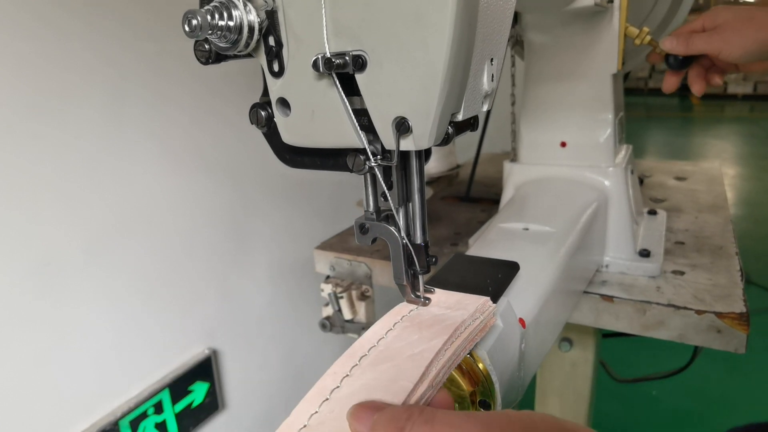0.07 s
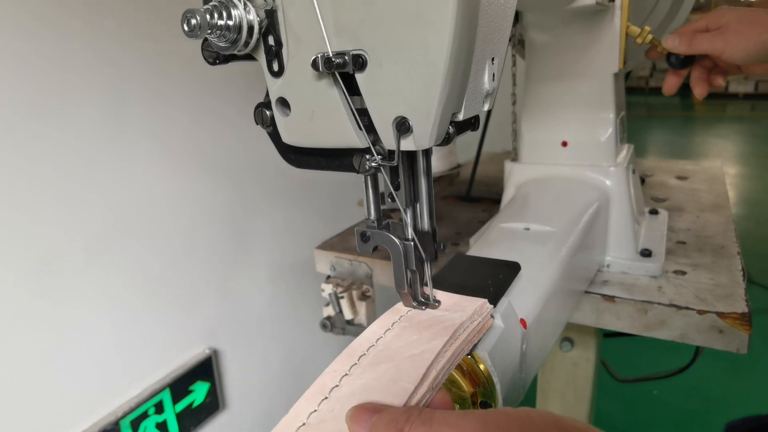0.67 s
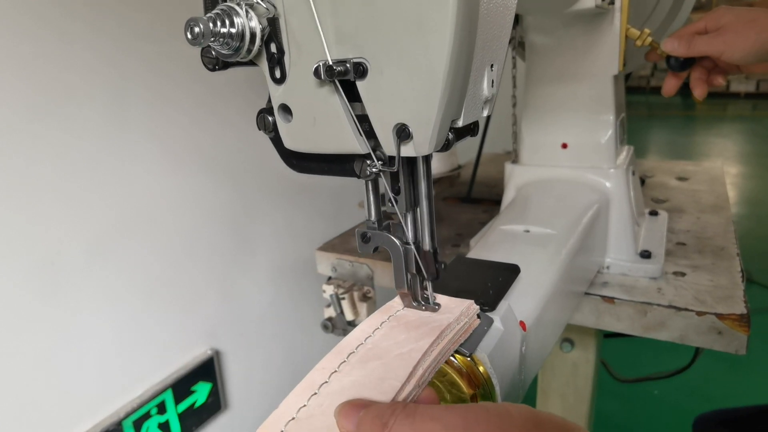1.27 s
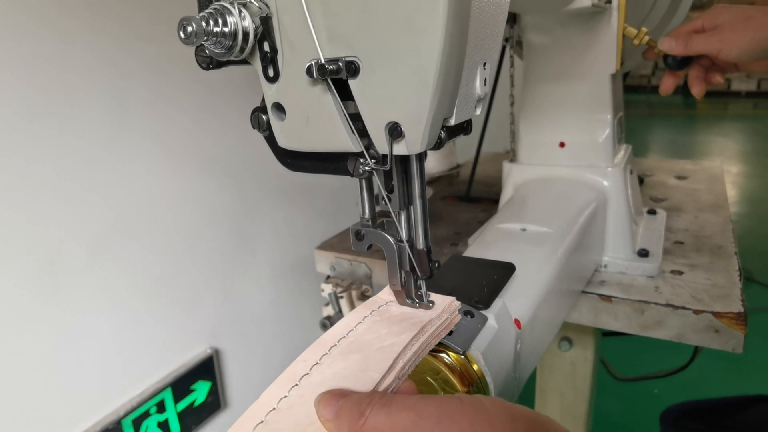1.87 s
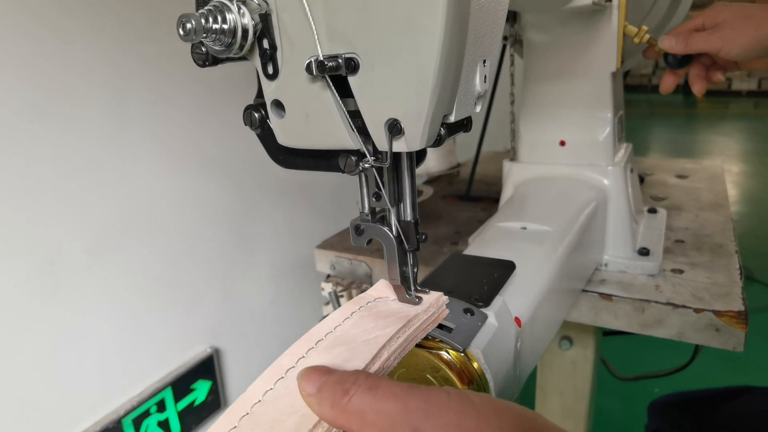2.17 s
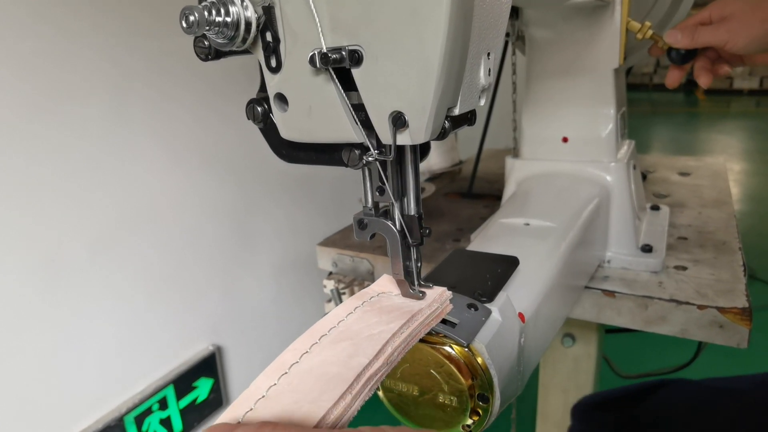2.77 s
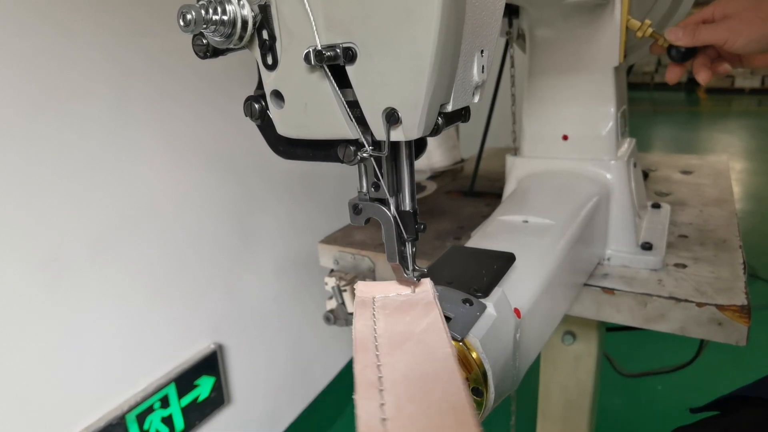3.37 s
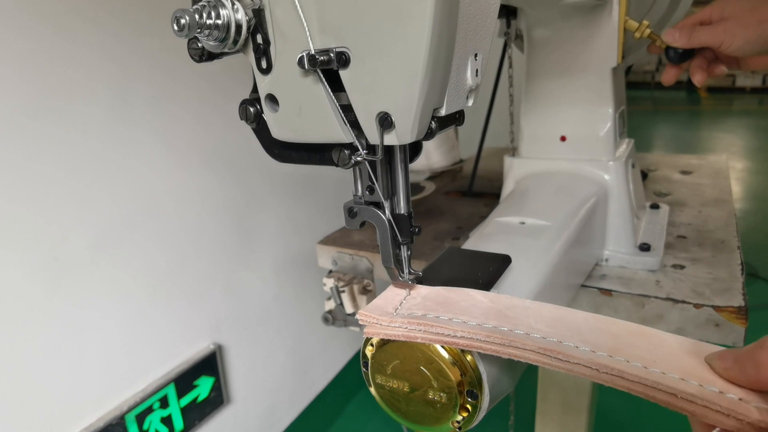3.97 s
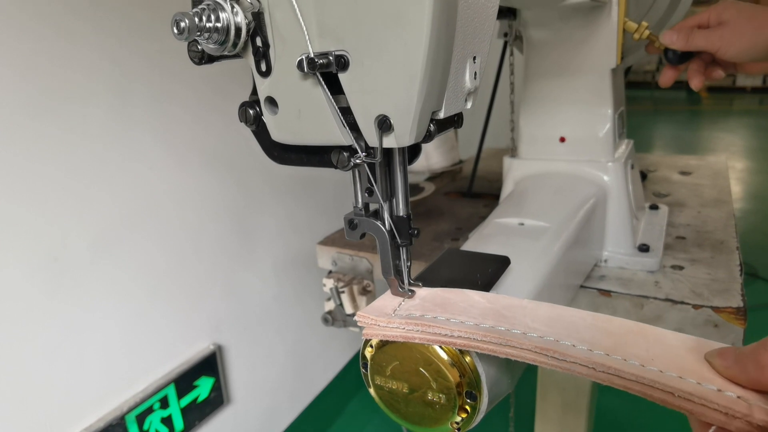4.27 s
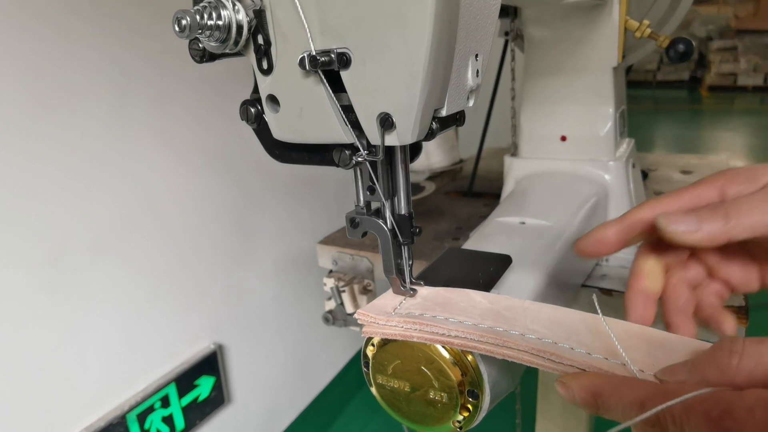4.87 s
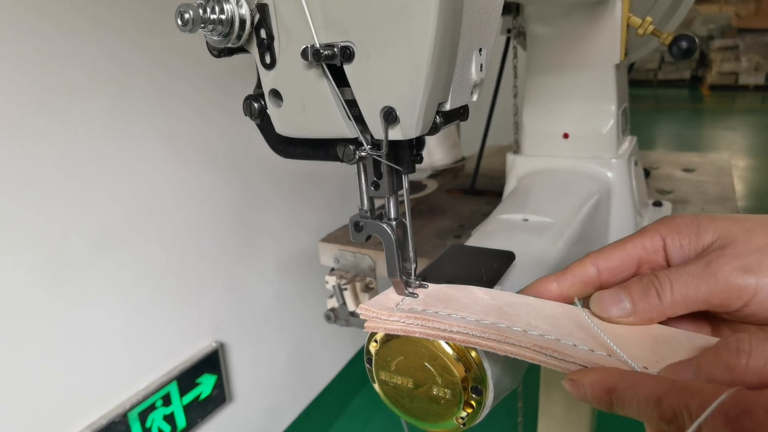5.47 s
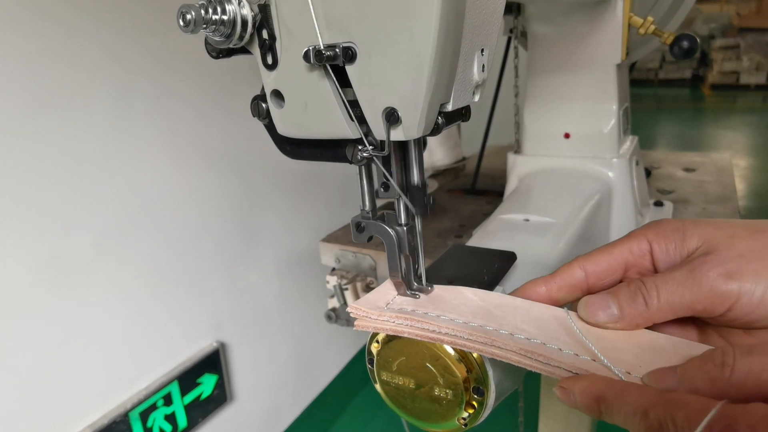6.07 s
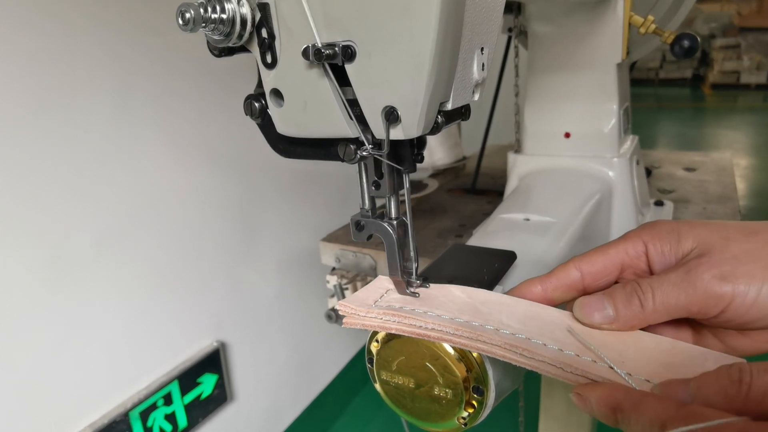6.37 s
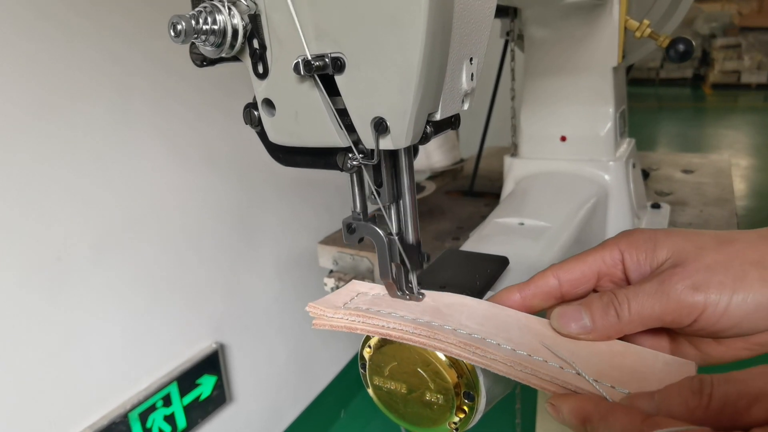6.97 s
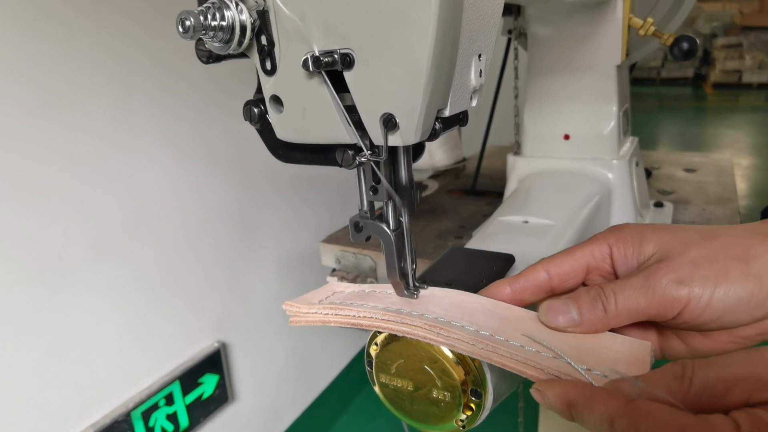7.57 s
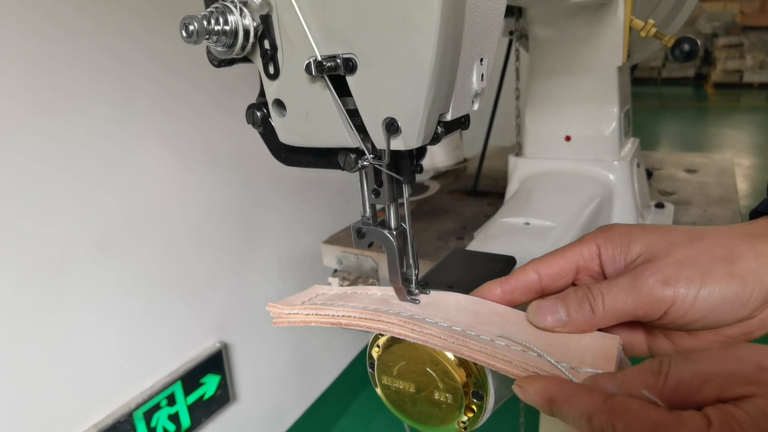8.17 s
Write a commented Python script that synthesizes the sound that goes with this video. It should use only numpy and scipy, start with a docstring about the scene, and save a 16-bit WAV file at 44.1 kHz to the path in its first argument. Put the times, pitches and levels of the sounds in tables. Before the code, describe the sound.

A heavy industrial sewing machine clacks through slow stitches, pauses for a hissing lever snap and a sharp slam, then stitches faster.

```python
"""A factory hall, two microphones close to a heavy walking-foot sewing machine on a thick leather strap.
Three slow stitches; the foot latches up with a hiss, the strap is turned, the foot snaps down; then
faster stitching. In each turn of the shaft links tick, the feed snaps, the feet thump and ring the iron
arm, and the needle bar clacks; the faster it turns, the louder it clatters. The hall rings on behind
each blow, machines drone far off, and a limiter ducks the two loud lever snaps."""
import sys
import numpy as np
from scipy import signal
from scipy.fft import rfft, irfft, next_fast_len
from scipy.io import wavfile
from scipy.ndimage import uniform_filter1d

SR = 44100
rng = np.random.default_rng(int(sys.argv[2]) if len(sys.argv) > 2 else 0)


def to_wav(sig):
    """Store sig (one row per channel, or 1-D mono) as 16-bit WAV at the path in sys.argv[1].

    Samples outside -1..1 are clipped; the rate is SR.
    """
    pcm = np.clip(np.atleast_2d(sig), -1, 1) * 32767
    pcm = np.round(pcm).astype(np.int16)
    wavfile.write(sys.argv[1], SR, pcm.T)  # frames by channels


N = 361619


# stitches: (first foot lands [s], its thump [dB], its pitch [Hz], second foot's lag [s], its thump [dB],
# arm ring [dB], needle bar clacks [s], its level [dB], linkage clatter [dB])
STITCHES = [(.2965, -5.5, 330, .02, -23, -18.5, .5243, -8.5, 4),
            (.884, -16.5, 251, .0266, -19.5, -18, 1.1247, -10.5, 0.5),
            (1.47, -14, 249, .0228, -16.5, -12.5, 1.7041, -8, 1.5),
            (5.329, -16.5, 319, .0038, -29, -23.5, 5.5319, -11, 1),
            (5.822, -17, 267, .021, -18, -23, 6.0135, -6.5, 1),
            (6.279, -18, 247, .014, -27, -22, 6.3995, -13.5, 0.5),
            (6.58, -12.5, 240, .0124, -10, -12.5, 6.66, -2.5, 4.5),
            (6.797, -17, 230, .012, -12, -14.5, 6.8937, -5, 3),
            (7.063, -15.5, 264, .014, -21, -19, 7.177, -6, 0),
            (7.353, -17.5, 242, .011, -16.5, -21.5, 7.4498, -4, -3.5),
            (7.604, -21, 277, .009, -16.5, -21, 7.7069, -7, -0.5),
            (7.884, -14.5, 295, .02, -25, -22, 7.9791, -6, -2),
            (8.154, -20, 290, .011, -18, -19, 8.26, -7, -5.5)]
# motor runs: (start [s], stop [s], belt grips [s], its jolt [dB], feed snaps [share of the turn])
RUNS = [(.212, 2.008, .214, -24, .343), (5.21, 8.4, 5.28, -21, .365)]
# heavier thuds of the feet, mostly as they change over or rebound: (time [s], level [dB], pitch [Hz])
THUDS = [(1.678, -20, 300), (1.965, -29, 420), (5.988, -20, 270), (6.613, -16, 270), (6.882, -22, 300)]
# places in a turn, counted from the needle's clack: shaft at rest, feet landing, feet changing over
REST_SHARE, LAND_SHARE, CHANGE_SHARE = .5, .61, .955

def footfalls(soft_hz=310, ring_offset_db=-12, rebound_s=.0125):
    """Blows as (time [s], level [dB], pitch [Hz], ring [dB]): feet, belt jolts and needle strokes."""
    blows = [(s, -26, soft_hz, -27) for s in passes(CHANGE_SHARE)]
    blows += [(s, db, soft_hz, db + ring_offset_db) for _, _, s, db, _ in RUNS]
    blows += [(s, db, hz, db + ring_offset_db) for s, db, hz in THUDS]
    blows += [(s, db - 34, soft_hz, db - 24) for *_, s, db, _ in STITCHES]  # needle
    for s, first_db, first_hz, lag, second_db, ring_db, *_ in STITCHES:
        blows += [(s, first_db, first_hz, ring_db - 9), (s + lag, second_db, 320, ring_db)]
        late, higher = rng.uniform(.8, 1.2, 2)  # the second foot rebounds unevenly
        db = second_db - 5
        blows.append((s + lag + rebound_s * late, db, 330 * higher, db + ring_offset_db))
    return blows


# modes of the cast-iron arm and table: (frequency [Hz], level [dB], t60 [s])
ARM_MODES = [(123.6, -24, 0.33), (188.8, -17, 0.3), (245, -15, 0.28), (289, -15.5, 0.65),
             (334.2, -15.5, .3), (363.5, -13.5, 0.12), (404, -13, 0.088), (649, -23, .07)]
# a foot's thud on leather: (frequency [Hz], level [dB])
THUD_SPECTRUM = [(100, -22), (250, 4), (400, 4.5), (650, 0), (900, -9), (1600, -16), (3000, -28),
                 (6000, -57)]

def feet(push_s=.003023, spread_db=2, ring_hz=527, ring_t60=.12):
    """Leather cushions each blow to a short push and a dull thud; the arm rings in a changing blend."""
    t, out = np.arange(SR // 2) / SR, np.zeros((2, N))
    late = t - 2 * push_s
    modes = np.array([amp(db - 60 * t / t60) * np.cos(2 * np.pi * hz * late)
                      for hz, db, t60 in ARM_MODES])
    modes *= amp(-2) * (1 - np.exp(-(t / push_s / 2) ** 2))
    ring = amp(-1 - 60 * t / ring_t60) * (1 - np.exp(-t / .0023)) * np.sin(2 * np.pi * ring_hz * t)
    for s, db, push_hz, ring_db in footfalls():
        push = amp(-3.5) * np.exp(-(late / push_s) ** 2 / 2) * np.cos(2 * np.pi * push_hz * late)
        blend = amp(spread_db * rng.standard_normal(len(ARM_MODES)))
        add(out, s, amp(db) * (push + blend @ modes) + amp(ring_db) * ring)
        add(out, s, blow(THUD_SPECTRUM, db - 14, rise=.00073, decay=.026))
    return out


# hard clacks outside the cycle, as the shaft stops and as it speeds up: (time [s], level [dB])
EXTRA_CLACKS = [(2.0077, -13), (6.3754, -15)]
# steel striking steel: (frequency [Hz], level [dB])
CLACK_SPECTRUM = [(1500, -25.5), (3500, -5.5), (5000, -4.5), (6000, -1), (7000, -8), (8200, -8.5),
                  (9300, -8), (10800, -8.5), (12000, -22), (15500, -33)]
# resonances of the steel bars and feet: (frequency [Hz], width [Hz], boost [dB])
STEEL_MODES = [(1130, 73, 3), (1880, 160, 2), (2150, 90, -2.5), (2550, 78, 2.5), (2760, 130, 7),
               (4630, 100, 4), (5540, 170, 5), (6000, 750, 3.5), (6620, 200, 4), (7300, 740, 3.5),
               (7600, 69, 2), (8060, 400, 6.5), (8500, 410, 5), (9490, 200, 3.5)]
# the knock of the head casting: (frequency [Hz], level [dB])
HEAD_SPECTRUM = [(150, -10), (450, 5), (800, 3.5), (1400, -3.5), (2400, 5), (3500, -27), (5000, -9),
                 (9000, -41)]
# pitches around which the head casting rings: (frequency [Hz])
HEAD_MODES = [680, 1120, 1520, 1820, 2150, 2480, 2760]

def needle_bar(hold_s=.0095, lead_s=.014, detune=.03):
    """Steel grazes steel, strikes and chatters; the head casting knocks and rings anew each time."""
    out = np.zeros((2, N))
    strokes = [(s, db) for *_, s, db, _ in STITCHES]
    for s, db in strokes + EXTRA_CLACKS:
        add(out, s - lead_s, blow(TICK_SPECTRUM, db - 22, rise=.0057, decay=.0043, hold=lead_s))
        add(out, s, blow(CLACK_SPECTRUM, db - 9, rise=.00037, decay=.0043, hold=hold_s, variety=.46))
        add(out, s, blow(HEAD_SPECTRUM, -27.5, rise=.00099, decay=.016, hold=hold_s, variety=.36))
        for hz in HEAD_MODES:
            detuned_hz = hz * (1 + detune * rng.uniform(-1, 1))
            add(out, s, ping(detuned_hz, db=-35 + 3 * rng.standard_normal(), decay=.014))
    return out * chatter(depth_db=2, size=30)


def feed(db_per_doubling=1):
    """The feed takes up the strap once a turn with a bright snap."""
    out, (_, speed, _) = np.zeros((2, N)), motion()
    for start, stop, _, _, share in RUNS:
        for s in passes(share):
            if start < s < stop:
                db = db_per_doubling * np.log2(speed[int(s * SR)])
                add(out, s, blow(TICK_SPECTRUM, db - 25, rise=.00048, decay=.004, hold=.0066, variety=.22))
                add(out, s, sparkle(db - 38))
                add(out, s, blow(HEAD_SPECTRUM, db - 33, rise=.001, decay=.015, hold=.0073, variety=.49))
    return out


# links and thread take-up, ticking once a turn:
# (place [share of the turn], level at usual speed [dB], change per doubling of speed [dB], ring [Hz])
CYCLE_TICKS = [(.138, -19.5, -4, 10900), (.291, -20, 5, 5740), (.553, -19, 5, 7950),
               (0.806, -25, -0.5, 6820)]
# distinct clicks of levers and slack links: (time [s], level [dB], ring [Hz])
SLACK_CLICKS = [(0.2605, -21, 5900), (.272, -20, 5900), (.29, -10, 7400), (.4493, -19.5, 5870),
                (1.0654, -17.5, 7100), (1.6685, -21, 6130), (2.012, -6, 9100), (2.6607, -29, 6700),
                (2.6854, -24.5, 8500), (2.9476, -24.5, 8730), (3.051, -15, 5930), (3.1895, -16, 7280),
                (4.3415, -31, 7800), (5.3293, -24, 6900), (5.4742, -18.5, 6000), (5.5055, -17, 6950),
                (5.6738, -12.5, 5760), (5.7985, -13.5, 6100), (5.92, -19.5, 7200), (5.9638, -14, 6000),
                (6.1477, -11.5, 5830), (6.3535, -11, 7000), (6.402, -9, 7730), (6.457, -14, 8170),
                (6.4967, -11, 5750), (6.5205, -13, 8530), (6.5685, -13, 7650), (6.6351, -8, 8070),
                (6.8576, -11.5, 6200), (7.1394, -17.5, 6000), (7.4212, -16, 6900), (7.5615, -16, 5600),
                (7.589, -13, 7800), (7.6756, -16, 6950), (7.8585, -16, 7710), (7.942, -17, 5900)]
# a light steel tick: (frequency [Hz], level [dB])
TICK_SPECTRUM = [(200, -13), (900, -12), (4000, -13), (5500, 1), (7800, -3), (9300, 0.5), (10800, -3),
                 (12000, -10), (15500, -29)]

def links():
    """Light links take up their play, each with a ping and a glint; a faint steel scrape rings on behind."""
    out, (_, speed, _) = np.zeros((2, N)), motion()
    cycle = [(s, db + per_doubling * np.log2(speed[int(s * SR)]), hz)
             for share, db, per_doubling, hz in CYCLE_TICKS for s in passes(share)]
    for s, db, hz in cycle + SLACK_CLICKS:
        add(out, s, blow(TICK_SPECTRUM, db - 6.5, rise=.0006, decay=.0034, hold=.0003,
                         variety=.5, ring=(hz, 500, 9)))
        add(out, s, ping(hz, db - 9, decay=.0035))
        add(out, s, sparkle(db - 31))
        add(out, s, blow(SLIDE_SPECTRUM, db - 22, rise=.00098, decay=.016))
    return out


def loose_joints(per_turn=10, db_per_doubling=10, spread_db=2, low_hz=800, high_hz=3600):
    """Worn joints knock at random places in the turn with a short metallic ring, harder at speed."""
    out, (angle, speed, clatter_db) = np.zeros((2, N)), motion()
    hits = np.flatnonzero(rng.random(N) < per_turn * np.gradient(angle))
    for i, (size, pitch) in zip(hits, rng.random((len(hits), 2))):
        db = -38.5 + db_per_doubling * np.log2(speed[i]) + clatter_db[i] + spread_db * (2 * size - 1)
        hz = low_hz * (high_hz / low_hz) ** pitch
        add(out, i / SR, blow(SLIDE_SPECTRUM, db, rise=.0007, decay=.011, ring=(hz, 220, 14)))
    return out


# knocks of the foot lifter: (time [s], level [dB], decay [s])
LIFTER_KNOCKS = [(2.686, -44, .015), (3.029, -33, 0.013), (3.049, -19, 0.0045), (3.056, -17, .003),
                 (4.429, -11, 0.0034)]
# the lifter knocking, going up and dropping: (frequency [Hz], level [dB])
KNOCK_SPECTRUM = [(200, -8), (750, -1), (1400, -15), (2000, 12.5), (2700, -12), (4000, -12), (9000, -23)]
LIFT_SPECTRUM = [(200, -20), (1300, -33), (1650, -14), (3000, -18.5), (4700, -19), (5300, -3.5), (6600, -4),
                 (7700, 2), (8400, -7), (10300, -13), (11300, -22), (12300, -32), (15000, -36)]
DROP_SPECTRUM = [(150, -34), (300, -5.5), (1150, -10), (1700, -12), (2500, -1), (3700, -3), (5200, 3),
                 (7900, 1), (9200, -10), (11000, -18), (12000, -37), (15500, -49)]
# resonances of the lifter and of the steel foot: (frequency [Hz], width [Hz], boost [dB])
LIFTER_MODES = [(2080, 400, 6), (5390, 150, 6), (6020, 150, 7), (7270, 200, 8), (9900, 300, 8)]
FOOT_MODES = [(800, 400, 11.5), (1420, 160, 12), (1970, 230, 18), (5550, 400, 5), (6150, 250, 7)]
# modes of the presser bar as the foot lands: (frequency [Hz], level [dB], t60 [s])
PRESSER_MODES = [(291, -33.5, 0.46), (947, -39, 0.46), (1938, -31, 0.36), (2110, -30, 0.38),
                 (3295, -37, .38), (5459, -33, .45)]

def foot_lifter():
    """A spring pings, the lifter latches with a rasping hiss; later the foot slams and its bar rings."""
    t, out, hiss = np.arange(SR) / SR, np.zeros((2, N)), np.zeros((2, N))
    add(out, 2.9475, ping(8750, -46.5, decay=.049))
    for s, db, decay in LIFTER_KNOCKS:
        add(out, s, blow(KNOCK_SPECTRUM, db, rise=.0039, decay=decay))
    add(out, 3.0655, blow(LIFT_SPECTRUM, -13, rise=.004, decay=.003, hold=.004, body=LIFTER_MODES))
    add(out, 3.07, blow(LIFT_SPECTRUM, 5, rise=.004, decay=.003, hold=.0031, body=LIFTER_MODES))
    add(hiss, 3.08, blow(LIFT_SPECTRUM, -25.5, rise=.045, decay=.04, hold=.12, body=LIFTER_MODES))
    add(out, 4.408, blow(DROP_SPECTRUM, -33, rise=.02, decay=.005, hold=.02, body=FOOT_MODES))
    add(out, 4.4285, blow(DROP_SPECTRUM, -3.5, rise=.0024, decay=.0037, hold=.0055, body=FOOT_MODES))
    for hz, db, t60 in PRESSER_MODES:
        add(out, 4.43, amp(db - 60 * t / t60) * np.sin(2 * np.pi * hz * t))
    return out + hiss * chatter(depth_db=1.8, size=120)


# friction through one turn: (place [share of the turn], level [dB])
STROKE_FRICTION = [(0, 1), (.08, -11.5), (.19, -2.5), (.29, -7), (.37, -3), (.5, -5.5), (.6, -1.5),
                   (.78, -13), (.9, -7)]
# sliding bars and running gears: (frequency [Hz], level [dB])
SLIDE_SPECTRUM = [(200, -20), (700, -7), (1400, -0.5), (2500, 6), (3800, -0.5), (6000, 3), (8500, -4.5),
                  (10800, -5.5), (12200, -12), (15500, -26)]
GEAR_SPECTRUM = [(40, -23), (70, -16), (125, -9), (190, -4), (290, 0), (390, -3.5), (470, -19), (527, -5),
                 (590, -8.5), (900, -18.5), (2000, -52)]

def drive(swing_db=1.5, heaviest_share=.98, coast_s=.99):
    """Bars scrape and gears rumble under each turn's load, louder with speed; the stopped motor coasts."""
    t, (angle, speed, clatter_db) = np.arange(N) / SR, motion()
    stroke_db = np.interp(angle, *np.transpose(STROKE_FRICTION), period=1)
    friction = amp(-36.5 + stroke_db + clatter_db) * speed ** 1.4
    scrape = friction * noise(N, SLIDE_SPECTRUM, STEEL_MODES) * rattle(per_s=50, decay=.0077, smooth=.94)
    load_db = swing_db * np.cos(2 * np.pi * (angle - heaviest_share))
    gears = amp(-36.5 + load_db + .44 * clatter_db) * speed ** .66
    coast = amp(-53) * sum((t > stop) * np.exp(-abs(t - stop) / coast_s) for _, stop, *_ in RUNS)
    return scrape + (gears + coast) * noise(N, GEAR_SPECTRUM)


# the strap hauled along by the feed: (frequency [Hz], level [dB])
HAUL_SPECTRUM = [(65, -24), (118, 0), (200, 0), (340, -22), (1500, -80)]

def haul(thread_share=.24, rumble_share=.37):
    """After each clack the thread crackles as it tightens and the strap moves on with a low rumble."""
    angle, speed, clatter_db = motion()
    hauling = np.exp(-((angle % 1 - rumble_share) / .15) ** 2)
    tightening = np.exp(-((angle % 1 - thread_share) / .08) ** 2)
    rumble = amp(-34.5) * hauling * noise(N, HAUL_SPECTRUM)
    thread = amp(-40 + clatter_db) * tightening * noise(N, TICK_SPECTRUM, STEEL_MODES)
    return speed * (rumble + thread * rattle(per_s=110, decay=.002, smooth=0))


# the strap rubs on the table: (middle [s], half length [s], level [dB])
STRAP_RUB = (2.6, 0.5, -50.5)
# the strap is dragged over the arm: (time [s], level [dB])
DRAG_LEVEL = [(1.98, -66), (2.12, -36), (2.36, -42), (2.6, -50), (2.78, -54), (2.88, -45.5), (3.05, -45.5),
              (3.12, -81)]
# dull bumps of the work: (time [s], level [dB], decay [s])
TABLE_BUMPS = [(2.151, -34, .025), (2.213, -28, .035)]
# rubbing leather and a bump on the table: (frequency [Hz], level [dB])
LEATHER_SPECTRUM = [(100, -14), (300, 3), (700, -4), (2200, -7.5), (4500, -15), (10000, -25), (15000, -52)]
BUMP_SPECTRUM = [(30, -20), (50, -3), (90, 4), (130, 0), (220, 2.5), (300, -12), (600, -19), (2000, -53)]

def handling():
    """Hands shift the work at the stop: the strap rubs, drags with a rumble and bumps the table."""
    t, (middle, half, rub_db) = np.arange(N) / SR, STRAP_RUB
    rub = amp(rub_db) * np.exp(-((t - middle) / half) ** 4)
    out = rub * chatter(depth_db=1.5, size=2000) * noise(N, LEATHER_SPECTRUM)
    out += amp(np.interp(t, *np.transpose(DRAG_LEVEL))) * noise(N, BUMP_SPECTRUM)
    for s, db, decay in TABLE_BUMPS:
        add(out, s, blow(BUMP_SPECTRUM, db, rise=.0084, decay=decay))
    return out


# the hall's reverberation before scaling by t60_share: (frequency [Hz], t60 [s])
HALL_DECAY = [(200, 0.96), (550, 0.64), (1400, 0.77), (3700, 0.77), (7000, 0.63), (10000, 0.56),
              (14000, 0.46)]

def hall(x, build_s, t60_share):
    """The hall answers with a diffuse tail that builds up, then dies at its own speed in each band."""
    hz, t, bands = signal.stft(noise(SR), SR, nperseg=256)
    t60 = t60_share * read(HALL_DECAY, hz)[:, None]
    tail = signal.istft(bands * amp(-60 * t / t60), SR, nperseg=256)[1][:, :SR]
    tail *= 1 - np.exp(-np.arange(SR) / SR / build_s)
    return signal.fftconvolve(x, tail / np.linalg.norm(tail[0]), axes=1)[:, :N]


# room tone of the hall: (frequency [Hz], level [dB])
AIR_SPECTRUM = [(12, -36), (20, -21), (53, 0.5), (107, -13.5), (127, -8), (204, -10.5), (450, -21),
                (698, -22.5), (1570, -26.5), (2140, -18.5), (3250, -34.5), (8650, -33), (16000, -88)]
# motor hum: (time [s], level [dB])
HUM_LEVEL = [(0, -49), (1.2, -41), (2.9, -46.5), (4.0, -70), (7.4, -62), (7.7, -42), (8.2, -57)]

def factory(hum_hz=49):
    """Motors and distant machines: a wash of air, a wavering hum and a thin whirr."""
    t = np.arange(N) / SR
    waver = np.minimum(chatter(depth_db=3.5, size=6000), 2)
    hum = amp(np.interp(t, *np.transpose(HUM_LEVEL)) - 1) * np.sin(2 * np.pi * hum_hz * t) * waver
    whirr_spectrum = [(800, -30), (1800, 0), (2400, -21), (3500, -30), (6000, 29), (9000, -32),
                      (12000, -45)]
    whirr = amp(-66) * noise(N, whirr_spectrum, STEEL_MODES)
    return amp(-47.5) * noise(N, AIR_SPECTRUM) + hum + whirr


def shaft():
    """Times and turns completed: the shaft passes the same places in each stitch, resting between runs."""
    lands, *_, needles, _, _ = np.transpose(STITCHES)
    marks = [(s, k + LAND_SHARE) for k, s in enumerate(lands)]
    marks += [(s, k + 1) for k, s in enumerate(needles)]
    marks += [(s, np.sum(needles < s) + REST_SHARE) for run in RUNS for s in run[:2]]
    return np.transpose(sorted(marks))


def passes(share):
    """The moments at which the shaft passes one place in its turn."""
    times, turns = shaft()
    wanted = np.arange(len(STITCHES) + 1) + share
    moments = np.interp(wanted[wanted > turns[0]], turns, times)
    return moments[moments < N / SR]


def motion(lag_s=.017, usual_turns_per_s=2.6):
    """For every sample: turns completed, speed as a multiple of the usual one, and clatter [dB]."""
    t = np.arange(N) / SR
    angle, keep = np.interp(t, *shaft()), np.exp(-1 / (lag_s * SR))
    speed = signal.lfilter([1 - keep], [1, -keep], np.gradient(angle) * SR / usual_turns_per_s)
    lands, *_, clatter_db = np.transpose(STITCHES)
    return angle, np.maximum(speed, 1e-6), np.interp(t, lands, clatter_db)


def blow(spectrum, db, rise, decay, hold=0., variety=0., ring=None, body=STEEL_MODES):
    """A noise burst swells, holds and dies; with variety, each blow favours other modes of the body."""
    t = np.arange(next_fast_len(int((hold + 8 * decay + .02) * SR))) / SR
    modes = np.array(body, float)
    modes[:, 2] *= 1 + variety * rng.standard_normal(len(modes))
    if ring is not None:
        modes = np.vstack([modes, ring])
    envelope = (1 - np.exp(-t / rise)) * np.exp(-np.maximum(t - hold, 0) / decay)
    return amp(db) * envelope * noise(len(t), spectrum, modes)


def ping(hz, db, decay):
    """One mode of a metal part, reaching each microphone in its own phase."""
    t = np.arange(int(7 * decay * SR)) / SR
    envelope = (1 - np.exp(-t / .00032)) * np.exp(-t / decay)
    return amp(db) * envelope * np.sin(2 * np.pi * (hz * t + rng.random((2, 1))))


def sparkle(db):
    """The smallest steel parts glint: five high, brief modes, other ones at each blow."""
    return sum(ping(hz, db, decay=.004) for hz in rng.uniform(9000, 13500, 5))


def chatter(depth_db, size):
    """The level flickers, as when loose parts touch and part: a gain of rms 1, smooth over size samples."""
    return evened(amp(depth_db * evened(uniform_filter1d(rng.standard_normal(N), size))))


def rattle(per_s, decay, smooth):
    """Random knocks over a smooth slide: a gain of rms 1."""
    knocks = (rng.random(N) < per_s / SR) * rng.exponential(1, N)
    return evened(smooth + evened(signal.lfilter([1], [1, -np.exp(-1 / (decay * SR))], knocks)))


# likeness of the left and right microphones: (frequency [Hz], correlation [0 to 1])
MIC_CORRELATION = [(100, 0.97), (350, 0.96), (600, 0.77), (1000, 0.41), (2000, 0.028), (10000, 0.11)]

def noise(size, spectrum=None, modes=()):
    """Noise of rms 1 at the two microphones, coloured by a spectrum and by resonances."""
    hz = np.fft.rfftfreq(size, 1 / SR)
    left, other = rfft(rng.standard_normal((2, size)))
    same = read(MIC_CORRELATION, hz)
    right = same * left + np.sqrt(1 - same ** 2) * other
    colour_db = read(spectrum, hz) if spectrum is not None else 0 * hz
    for centre, width, db in modes:
        colour_db += db / (1 + (2 * (hz - centre) / width) ** 2)
    return evened(irfft(np.array([left, right]) * amp(colour_db), size))


def read(points, hz):
    """A curve joined by straight lines on a log-frequency axis."""
    f, value = np.transpose(points)
    return np.interp(np.log(hz + 1), np.log(f + 1), value)


def amp(db):
    return 10 ** (np.asarray(db) / 20)


def evened(x):
    return x / np.sqrt(np.mean(x ** 2) + 1e-20)


def add(mix, s, sound):
    part = mix[..., round(s * SR):][..., :sound.shape[-1]]
    part += sound[..., :part.shape[-1]]


def scene():
    """The machine up close, its steel head a little to the left, with the hall behind it."""
    thumps = feet()
    steel = needle_bar() + feed() + links() + loose_joints()
    snaps = foot_lifter()
    head = (steel + amp(-6) * hall(steel, build_s=.0018, t60_share=.57)) * amp([[1], [-1]])
    arm = thumps + amp(-8) * hall(thumps, build_s=.00083, t60_share=.57)
    lifter = snaps + amp(-5) * hall(snaps, build_s=.0021, t60_share=.99)
    return head + arm + lifter + drive() + haul() + handling() + factory()


def record(dry, limit_db=-11, recovery_db_per_s=130, edge_hz=15900):
    """Behind the microphones a limiter ducks loud peaks and recovers steadily; a low-pass follows."""
    power_db = 10 * np.log10(abs(uniform_filter1d((dry ** 2).mean(0), size=130)) + 1e-12)
    fall = np.arange(N) * recovery_db_per_s / SR
    held_db = np.maximum.accumulate(power_db + fall) - fall
    over_db = np.maximum(held_db - limit_db, 0)
    ducked = np.clip(dry / amp(uniform_filter1d(over_db, size=100)), -1, 1)
    low_pass = signal.firwin(255, edge_hz, window=("kaiser", 9), fs=SR)
    return signal.oaconvolve(ducked, low_pass[None], "same")


dry = scene()
out = record(dry)
to_wav(out)
```